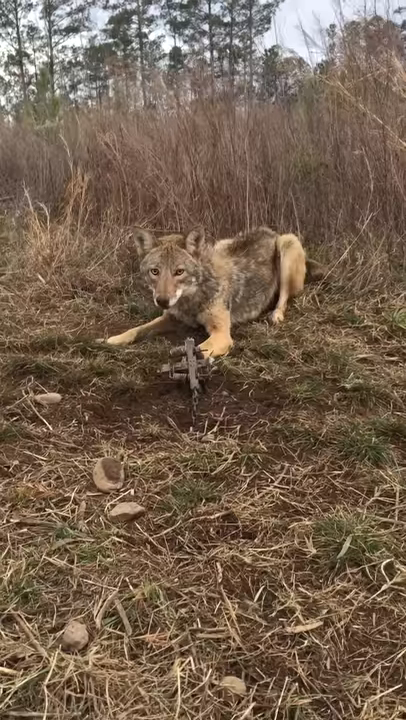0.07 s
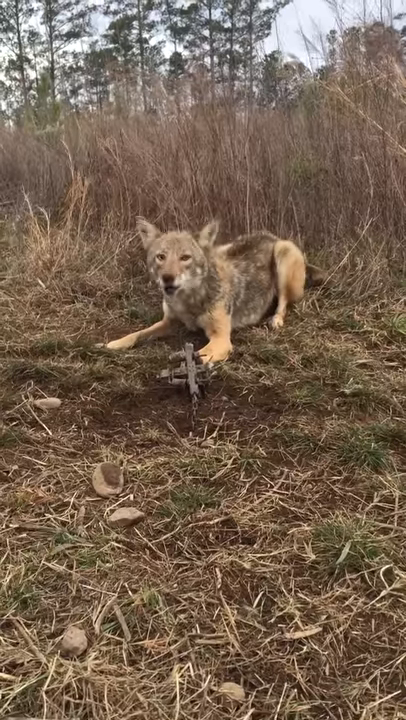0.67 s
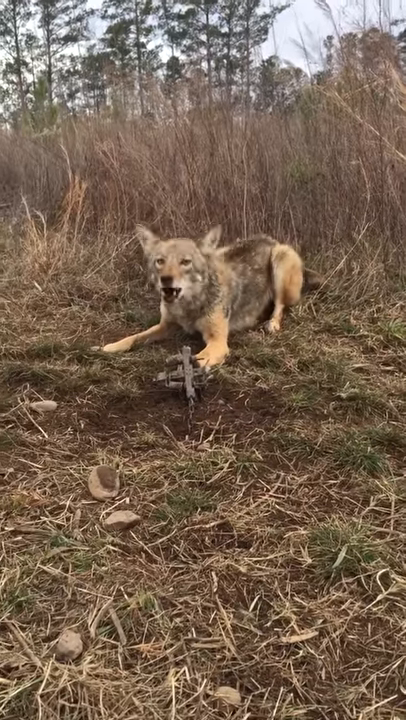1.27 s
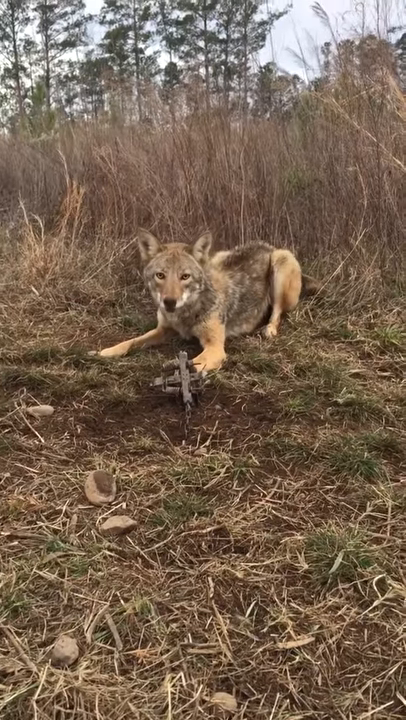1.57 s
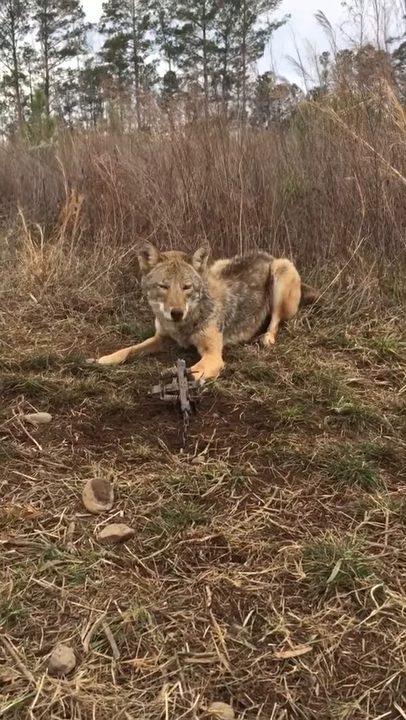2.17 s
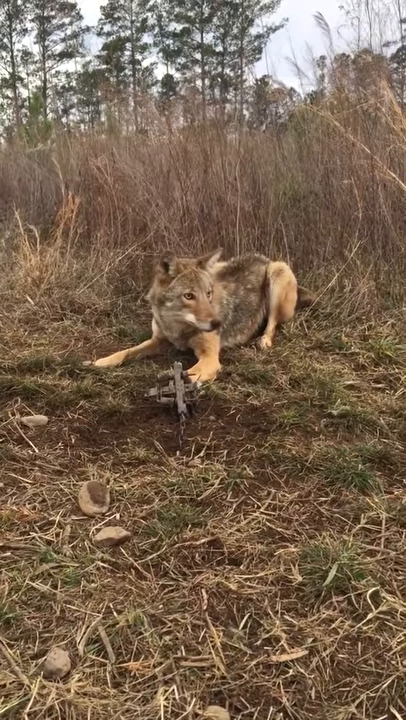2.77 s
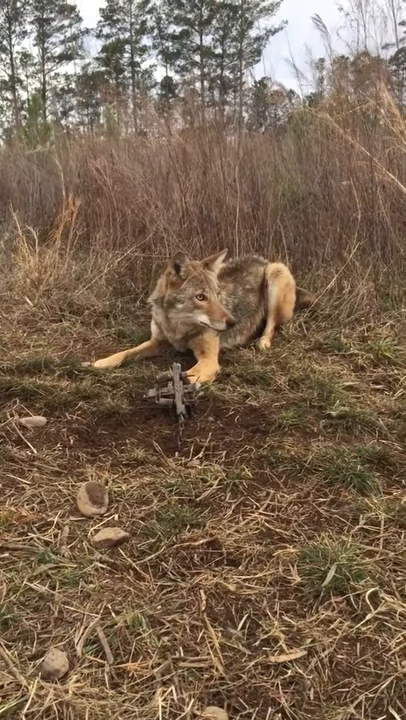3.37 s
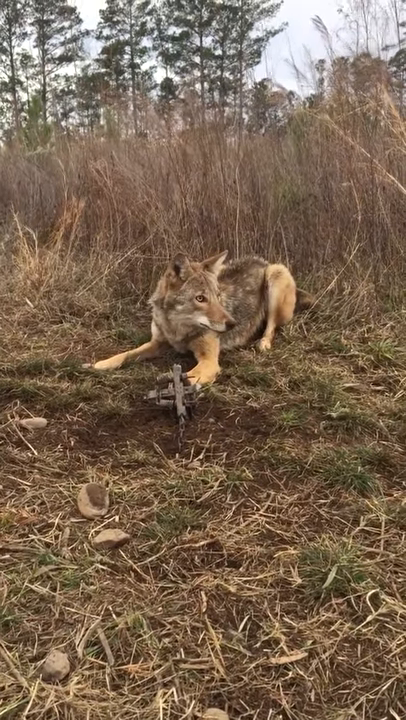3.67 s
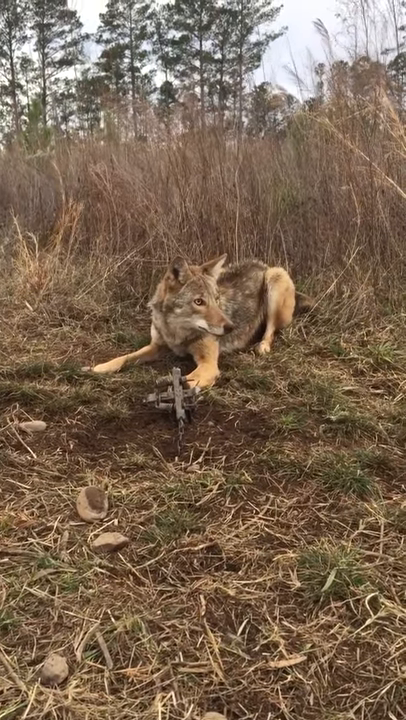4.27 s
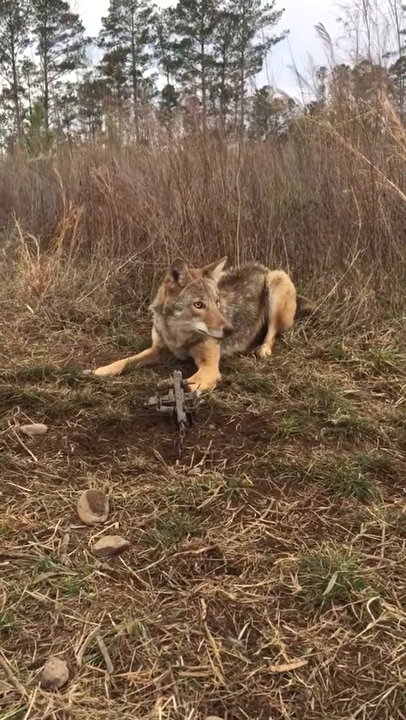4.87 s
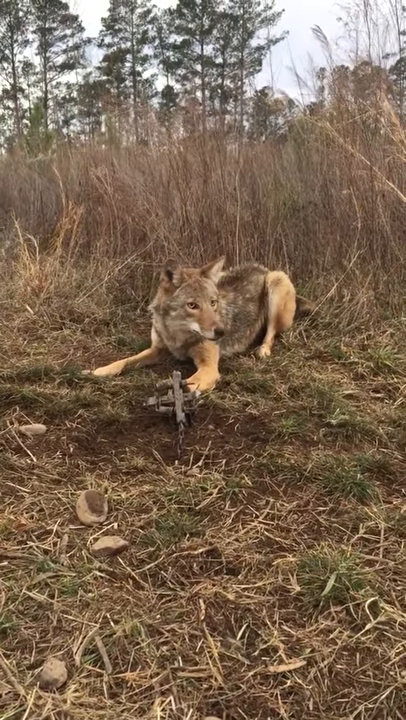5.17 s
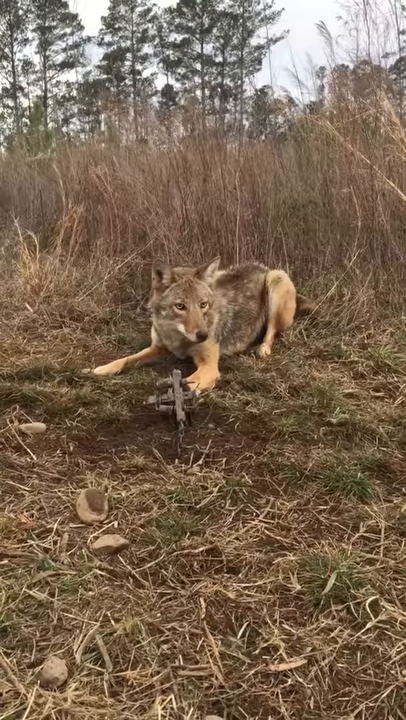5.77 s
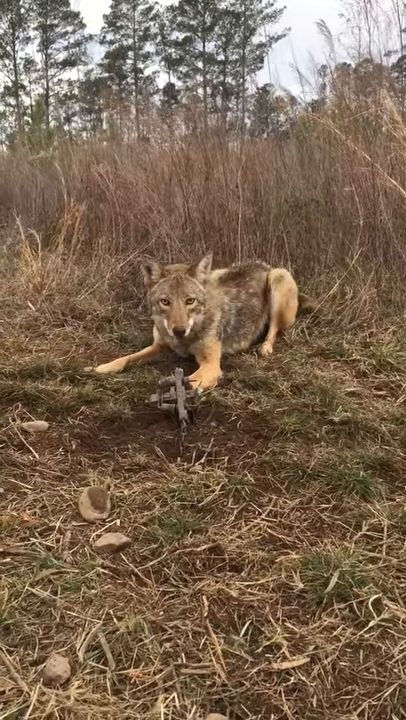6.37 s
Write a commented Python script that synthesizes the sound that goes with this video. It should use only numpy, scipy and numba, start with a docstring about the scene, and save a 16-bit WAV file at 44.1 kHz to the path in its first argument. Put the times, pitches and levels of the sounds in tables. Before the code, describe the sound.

A coyote a few metres away in an open field starts a low growl that breaks at once into a harsh, rising bark. The growl runs on, speeds up into a second bark and stops. The barks slightly overload the phone microphone. Afterwards only faint, distant traffic hums, with a few soft bumps, a paw rustling dry grass and one small clink of chain.

```python
"""Far traffic hums across an open field; then a coyote, lying in dry grass a few metres from the
phone, growls and barks twice. Slow throat pulses ring its muzzle, speed up and break into a harsh,
rising tone that overloads the microphone and pushes the gain down; the growl runs on between the barks.
Then it lies quiet: the traffic returns as the gain recovers, and close by come soft bumps,
a paw in the grass and one clink of chain."""
import sys
import numpy as np
from scipy import signal
from scipy.fft import rfft, irfft
from scipy.io import wavfile
from scipy.ndimage import uniform_filter1d, minimum_filter1d
from numba import njit

SR = 44100
rng = np.random.default_rng(int(sys.argv[2]) if len(sys.argv) > 2 else 0)


def generate_wav(sig):
    """Save sig (samples, or channels by samples) to the path in sys.argv[1] as 16-bit PCM at SR."""
    pcm = np.round(np.clip(np.atleast_2d(sig).T, -1, 1) * 32767).astype(np.int16)
    wavfile.write(sys.argv[1], SR, pcm)


N = 292383
T = np.arange(N) / SR

# spectra of the far traffic's rumble and of the soft wash above it: f/Hz, level/dB
RUMBLE_SPECTRUM = [(20, -36), (32, -15.5), (48, -2), (70, 4.5), (105, -5), (150, -12.5), (210, -21),
                   (300, -36.5), (600, -71.5)]
WASH_SPECTRUM = [(150, -13.5), (260, -3.5), (360, -1.5), (480, -11), (590, 1), (720, -5), (1020, 0),
                 (1350, -6.5), (1800, -10.5), (2500, -17), (4500, -17.5), (6300, -19.5), (11000, -25.5),
                 (17000, -22)]
# course of the rumble: t/s, level/dB
RUMBLE_LEVELS = [(0, -51), (1.5, -53), (2.1, -48.5), (3.6, -50), (5.2, -48), (6.6, -46)]
# thin far whines: start t/s, end t/s, f/Hz, level/dB
WHINES = [(0, .688, 851, -62.5), (0, 0.574, 657, -74.5), (1.401, 2.304, 846, -68),
          (2.503, 2.899, 572.5, -67.5), (2.5, 2.852, 1130, -69.5), (3.103, 3.801, 584, -71.5),
          (4.769, 4.968, 963, -60), (4.885, 5.694, 570, -70)]
# far falling whistles: start t/s, end t/s, first f/Hz, level/dB
WHISTLES = [(3.25, 3.348, 1840, -69), (3.44, 3.528, 1790, -73), (5.01, 5.097, 1610, -74),
            (5.301, 5.51, 1830, -69), (5.674, 5.868, 1958, -72.5)]
# spectrum of dry grass under a paw: f/Hz, level/dB
STALK_SPECTRUM = [(100, -10), (300, -0.5), (700, -2), (1500, -23), (3000, -23), (6000, -20), (10000, -31),
                  (17000, -38)]
# soft bumps on the ground: t/s, level/dB, f/Hz
BUMPS = [(3.117, -55, 313), (3.166, -53, 338.4), (3.961, -55.5, 353.4), (4.177, -47.5, 426),
         (4.234, -51, 750), (4.251, -47, 380), (4.303, -45.5, 404), (4.351, -44, 320), (5.633, -49, 390)]
# contacts within the clink of chain: t/s, level/dB
CHAIN_CONTACTS = [(4.291, -49.5), (4.314, -75)]
# modes of a link: f/Hz, width/Hz, level/dB
LINK_MODES = [(1180, 240, -5), (2290, 150, 2), (2550, 110, 0), (3400, 700, -18), (6600, 2000, -28)]
# pulse rate of the throat: t/s, f/Hz
PULSE_RATES = [(.495, 115), (.545, 247.5), (.69, 85.4), (.75, 77.6), (.83, 94.5), (.90, 95.9), (1.0, 101.2),
               (1.12, 110), (1.19, 132.5), (1.255, 215.4), (1.365, 80.36), (1.465, 61.1)]
# response of the nearly closed muzzle: f/Hz, level/dB
MUZZLE_RESPONSE = [(40, -21.5), (90, 0), (200, -0.5), (280, 0.5), (345, -13), (430, -1), (520, -4),
                   (650, -11.5), (780, -21.5), (900, -35), (1050, -44.5), (2200, -56), (4000, -71),
                   (16000, -76)]
# upper throat resonances, lips forward: f/Hz, width/Hz, level/dB
THROAT_MODES = [(1600, 105, -19), (1990, 120, -35.5), (2760, 170, -36), (4800, 260, -42), (5830, 600, -46),
                (8850, 800, -54)]
# resonances of half-open jaws (snarl) and of the wide-open mouth (roar): f/Hz, width/Hz, level/dB
SNARL_MODES = [(440, 260, 2.5), (723, 92, -0.5), (937, 220, -6.5), (1695, 300, -13), (2290, 370, -13),
               (2895, 340, -17.5), (4880, 160, -29), (5800, 540, -26.5), (7450, 420, -34.5),
               (9263, 860, -36.5), (11700, 1000, -41), (14500, 3000, -53)]
ROAR_MODES = [(623, 130, 0), (907, 260, -6), (1818, 210, -3), (2126, 280, 1.5), (2460, 330, -9),
              (3200, 570, -20), (4740, 650, -27.5), (5930, 190, -22), (6850, 610, -20.5), (9100, 730, -28),
              (13300, 5600, -36.5)]
# barks: start t/s, attack/s, hold/s, release/s, top f/Hz, tone level/dB, snarl level/dB, roar level/dB,
# starting mouth resonance f/Hz, ratio that raises the snarl resonances
BARKS = [(.523, .056, .052, .068, 645.5, 3.5, 0, 2.5, 2280, 1.07),
         (1.18, .107, .030, 0.051, 615, 2.5, -4, -3.5, 1619, 1.0)]
# response of the phone's microphone: f/Hz, level/dB
MICROPHONE_RESPONSE = [(1000, 0), (2100, -0.5), (3200, -2), (5000, -4), (10000, -2), (17000, -5)]

# the growl is louder the faster it beats, up to a full rate; it gives way to each bark
GROWL_DB, GROWL_FULL_HZ, GROWL_DB_PER_OCTAVE, GROWL_YIELD_DB = -23, 139, 23.5, -13
LIPS_BACK_HZ, LIPS_FORWARD_HZ, LIPS_SETTLE_S = 950, 715.6, .14
# a bark's pitch passes FULL_EFFORT_HZ as the attack ends, and sags as the push lets go
FULL_EFFORT_HZ, CLIMB_OCTAVES_PER_S, SAG_HZ = 561.2, 9.2, 40


def undb(db):
    """Decibels to gain."""
    return 10 ** (np.asarray(db) / 20)


def unit(x):
    """Scale to rms 1."""
    return x / np.sqrt(np.mean(x ** 2))


def noise():
    """White noise."""
    return rng.standard_normal(N)


def wander(rate_hz):
    """Smooth random motion, rms 1."""
    size = max(int(SR / rate_hz), 2)
    return unit(uniform_filter1d(uniform_filter1d(noise(), size), size))


def ramp(start, length):
    """0 before the start, rising evenly to 1 over the length."""
    return np.clip((T - start) / length, 0, 1)


def edge(x, hz, kind):
    """Steep low-pass or high-pass."""
    return signal.sosfilt(signal.butter(4, hz, kind, fs=SR, output="sos"), x)


def ring(x, hz, width):
    """One resonance, gain 1 at its centre."""
    return signal.lfilter(*signal.iirpeak(hz, hz / width, fs=SR), x + 1e-18)


def resonate(x, modes, order=2):
    """Resonances side by side; a higher order leaves darker valleys between them."""
    out = 0
    for hz, width, db in modes:
        band = signal.butter(order, [hz - width / 2, hz + width / 2], "band", fs=SR, output="sos")
        out += undb(db) * signal.sosfilt(band, x + 1e-18)
    return out


@njit
def moving_ring(x, hz, width):
    """A resonance whose centre moves."""
    y, band, low = np.empty(len(x)), 0., 0.
    for i in range(len(x)):
        g, damping = np.tan(np.pi * hz[i] / SR), width / hz[i]
        v = (band + g * (x[i] - low)) / (1 + g * (g + damping))
        band, low = 2 * v - band, low + 2 * g * v
        y[i] = damping * v
    return y


def formant(x, hz, width):
    """A moving resonance applied twice, for dark valleys on both sides."""
    return moving_ring(moving_ring(x, hz, float(width)), hz, float(width))


def colour(x, points, size=4096):
    """Causal filter through points of f/Hz, level/dB."""
    hz, db = np.transpose(points)
    grid = np.linspace(1, SR / 2, size // 2 + 1)
    gain = undb(np.interp(np.log(grid), np.log(hz), db))
    cepstrum = irfft(np.log(gain))
    cepstrum[1:size // 2] *= 2
    cepstrum[size // 2 + 1:] = 0
    return signal.fftconvolve(x, irfft(np.exp(rfft(cepstrum))))[:N]


def far_tone(start, end, hz, db, blur):
    """A tone that swells and fades; the long path through moving air blurs it and makes it flutter."""
    swell = np.sqrt(2 * np.abs(np.sin(np.pi * ramp(start, end - start))))
    phase = 2 * np.pi * np.cumsum(hz * (1 + blur * wander(130))) / SR
    flutter = unit(1 + .33 * wander(120))
    return undb(db) * swell * flutter * np.sin(phase)


def far_traffic(wash_db=-64, fall_hz_per_s=2200):
    """Far across the field: a wavering rumble, a soft wash, and thin tones that come and go."""
    rumble_db = np.interp(T, *np.transpose(RUMBLE_LEVELS))
    out = unit(colour(noise(), RUMBLE_SPECTRUM)) * undb(rumble_db + wander(9))
    out += unit(colour(noise(), WASH_SPECTRUM)) * undb(wash_db + .22 * wander(7.7))
    for start, end, hz, db in WHINES:
        out += far_tone(start, end, hz, db, blur=.014)
    for start, end, first_hz, db in WHISTLES:
        hz = first_hz - fall_hz_per_s * np.clip(T - start, 0, end - start)
        out += far_tone(start, end, hz, db, blur=.05)
    return out


def open_ground(x, scatter_db=-29, t60=.12, delay_s=.012):
    """The direct sound, and a weak, short scatter back from the reeds."""
    t = T[:SR // 2]
    tail = ring(rng.standard_normal(len(t)), hz=1100, width=2200)
    tail *= np.exp(-np.log(1000) * t / t60) * (t > delay_s)
    tail /= np.sqrt(np.sum(tail ** 2))
    return x + undb(scatter_db) * signal.fftconvolve(x, tail)[:N]


def paw_in_grass(middle_s=4.225, spread_s=.06, db=-61, grain_db=5):
    """Dry stalks crackle under a dragging paw."""
    crackle = unit(colour(noise() * undb(grain_db * wander(700)), STALK_SPECTRUM))
    return undb(db) * crackle * np.exp(-((T - middle_s) / spread_s) ** 2)


def ground_bumps(thud_s=.0028, scuff_s=.011):
    """Dead bumps on the ground nearby, each with a little scuff."""
    out = np.zeros(N)
    for start, db, hz in BUMPS:
        age = np.maximum(T - start, 0)
        thud = -np.sin(2 * np.pi * hz * age) * np.exp(-age / thud_s)
        scuff = unit(ring(noise(), hz, width=hz)) * np.exp(-age / scuff_s) * (age > 0)
        out += undb(db) * (1.76 * thud + .055 * scuff)
    return out


def chain_clink(decay_s=.014):
    """Links touch and ring briefly."""
    contact = sum(undb(db) * np.exp(-np.abs(T - t) / decay_s) * (T > t) for t, db in CHAIN_CONTACTS)
    return contact * unit(resonate(noise(), LINK_MODES))


def effort(start, attack, hold, release):
    """The push behind one bark, 0 to 1."""
    return ramp(start, attack) - ramp(start + attack + hold, release)


def throat_hz():
    """Pulse rate of the throat at every moment."""
    return np.interp(T, *np.transpose(PULSE_RATES))


def lip_resonance():
    """Each bark pulls the lips back; as they settle forward their resonance sinks."""
    back = 0
    for start, attack, hold, release, *_ in BARKS:
        since_end = np.maximum(T - (start + attack + hold + release), 0)
        back += ramp(start, attack) * np.exp(-since_end / LIPS_SETTLE_S)
    return LIPS_FORWARD_HZ + (LIPS_BACK_HZ - LIPS_FORWARD_HZ) * back


def growl(attack_s=.016, release_s=.023, lowest_hz=55.3, lips_db=-12, leak_db=-32.5, shut_jaws_hz=334):
    """Separate slaps of the vocal folds ring the muzzle; air leaks with each and rings the throat."""
    hz = throat_hz()
    # each slap comes a little early or late, which smears the upper harmonics
    cycles = np.maximum.accumulate(np.cumsum(hz) / SR + .03 * wander(110))
    slaps = np.diff(np.floor(cycles), prepend=0) * np.sqrt(SR / hz) * undb(wander(100))
    leak = unit(np.exp(-(cycles % 1) / .7) * noise())
    lips_hz = lip_resonance()
    muzzle = edge(colour(slaps + .17 * leak, MUZZLE_RESPONSE), lowest_hz, "high")
    muzzle += undb(lips_db) * formant(slaps + .298 * leak, lips_hz, width=130)
    glide = (lips_hz / LIPS_FORWARD_HZ) ** .35  # the throat makes part of the lips' glide
    throat = sum(undb(db) * formant(.5 * slaps + leak, f * glide, width)
                 for f, width, db in THROAT_MODES)
    barking = sum(effort(*row[:4]) for row in BARKS)
    octaves = np.minimum(np.log2(hz / GROWL_FULL_HZ), 0)
    muzzle_db = GROWL_DB + GROWL_DB_PER_OCTAVE * octaves + GROWL_YIELD_DB * barking
    sounding = ramp(PULSE_RATES[0][0], attack_s) - ramp(PULSE_RATES[-1][0] - release_s, release_s)
    sound = (undb(muzzle_db) * muzzle + undb(leak_db) * throat) / np.std(muzzle) * sounding
    parted = ramp(*BARKS[0][:2])  # only the lows get out until the first bark parts the jaws
    return parted * sound + (1 - parted) * edge(sound, shut_jaws_hz, "low")


def fold_tone(hz, opening, jitter=.011, onset_jitter=.06, flutter_db=3.5):
    """The folds' tone and its phase: ragged and dull at first, steadier and brighter as they lock."""
    spread = jitter + onset_jitter * (1 - opening)
    phase = 2 * np.pi * np.cumsum(hz * (1 + spread * wander(300))) / SR
    overtones = undb(-28) * np.sin(2 * phase) + undb(-25) * np.sin(3 * phase)
    return unit(np.sin(phase) + opening * overtones) * undb(flutter_db * wander(370)), phase


def bark(row, unlocked_db=-6, mouth_db=4, mouth_rest_hz=1740):
    """The folds lock into a high tone as the jaws open; chopped air snarls, then roars in the mouth."""
    start, attack, hold, release, top_hz, tone_db, snarl_db, roar_db, first_mouth_hz, shift = row
    push = effort(start, attack, hold, release)
    octaves = CLIMB_OCTAVES_PER_S * np.clip(T - start - attack, -attack, hold)
    hz = np.minimum(FULL_EFFORT_HZ * 2 ** octaves, top_hz)
    hz -= SAG_HZ * ramp(start + attack + hold, release)
    opening = np.clip((hz - 460) / 110, 0, 1)  # the jaws open as the pitch climbs
    tone, phase = fold_tone(hz, opening)
    tone *= undb(tone_db + unlocked_db * (1 - opening))
    # the slow beating of the throat goes on and chops the air, as does the tone
    beat = 2 * np.pi * np.cumsum(throat_hz() * (1 + .2 * wander(160))) / SR
    air = noise() * (1 + .3 * np.cos(beat)) * (1 + .5 * np.cos(phase))
    jaw_modes = [(f * shift, width, db) for f, width, db in SNARL_MODES]
    snarl = unit(resonate(air, jaw_modes, order=3)) * undb(snarl_db) * np.sqrt(1 - opening)
    mouth_hz = first_mouth_hz + (mouth_rest_hz - first_mouth_hz) * ramp(start, attack + hold) ** 2
    mouth = undb(mouth_db) * formant(noise(), mouth_hz, width=230)
    roar = unit(resonate(air, ROAR_MODES) + mouth) * undb(roar_db) * np.sqrt(opening)
    return tone * push ** 2.2 + snarl * push ** 1.8 + roar * push ** 2.6


def scene():
    """The coyote a few metres off in an open field, traffic far behind; mono."""
    voice = growl() + sum(bark(row) for row in BARKS)
    return (open_ground(voice) + ground_bumps() + chain_clink() + paw_in_grass() + far_traffic())[None]


def gain_control(x, limit_db=-4, depth_db=-7, hold_s=.34, release_s=.4):
    """Loud sound turns the phone's gain down at once; it holds, then creeps back."""
    level_db = 10 * np.log10(np.abs(uniform_filter1d(x ** 2, size=256)) + 1e-12)
    cut_db = np.clip(limit_db - level_db, depth_db, 0)
    half_hold, half_release = int(hold_s * SR / 2), int(release_s * SR / 2)
    held = minimum_filter1d(cut_db, 2 * half_hold + 1, origin=half_hold, mode="nearest")
    eased = uniform_filter1d(held, 2 * half_release + 1, origin=half_release, mode="nearest")
    return x * undb(np.minimum(held, eased))


def record(dry, start_s=.079, ceiling=.92, top_hz=17250):
    """The phone starts, rides its gain, flattens the peaks of the barks and cuts the top."""
    x = gain_control(dry[0] * (T > start_s))
    flattened = x / (1 + (x / ceiling) ** 6) ** (1 / 6)
    top_cut = signal.ellip(10, .1, 70, top_hz, fs=SR, output="sos")
    return signal.sosfilt(top_cut, colour(flattened, MICROPHONE_RESPONSE))[None]


dry = scene()
out = record(dry)
generate_wav(out)
```